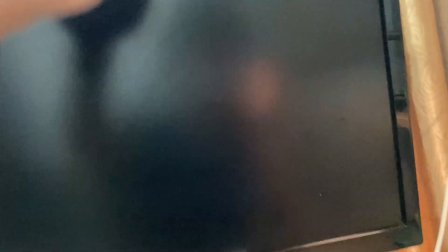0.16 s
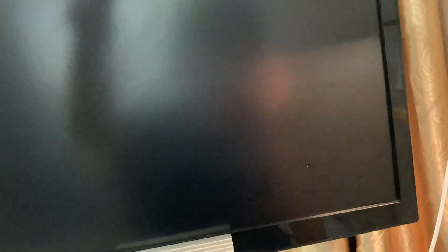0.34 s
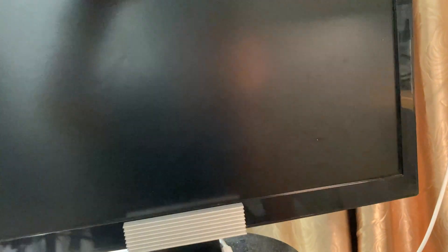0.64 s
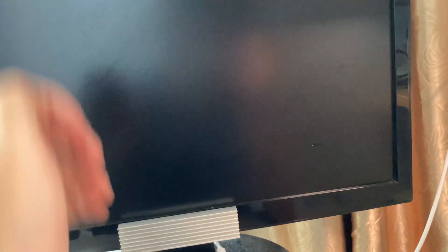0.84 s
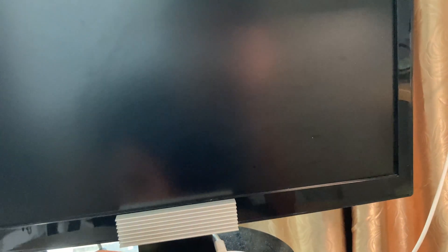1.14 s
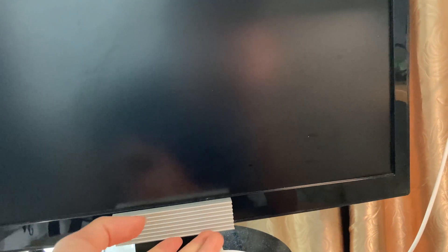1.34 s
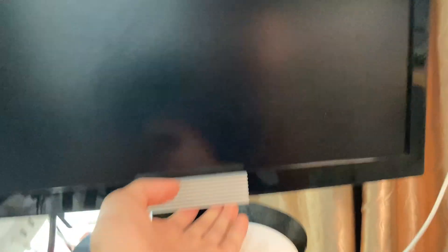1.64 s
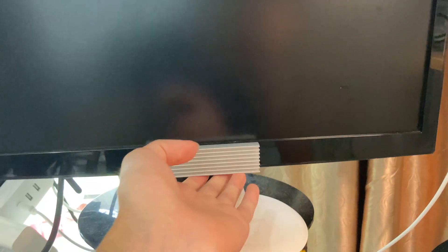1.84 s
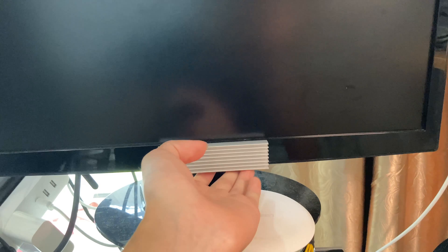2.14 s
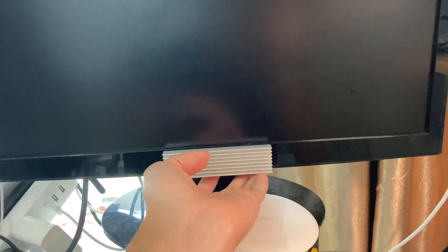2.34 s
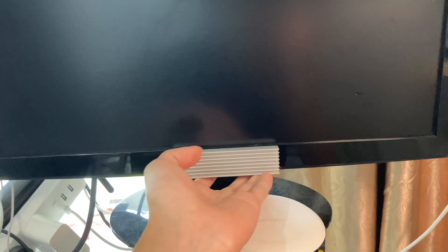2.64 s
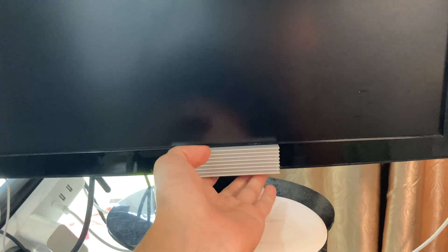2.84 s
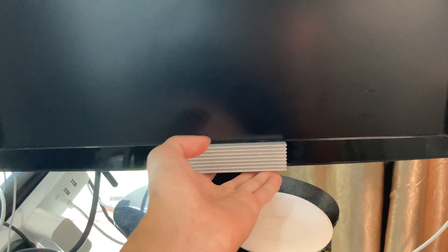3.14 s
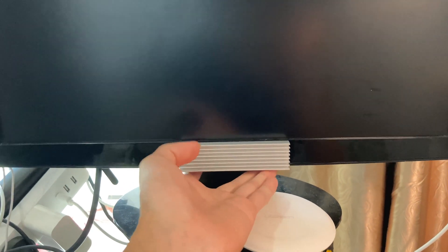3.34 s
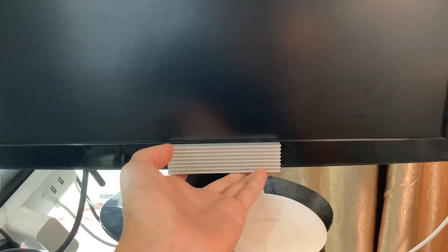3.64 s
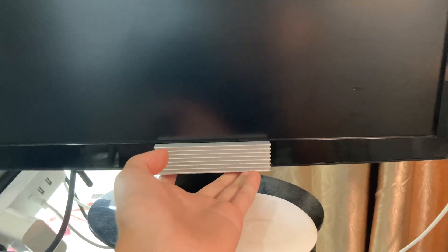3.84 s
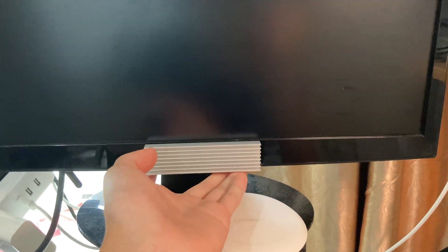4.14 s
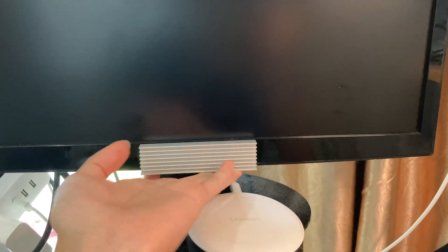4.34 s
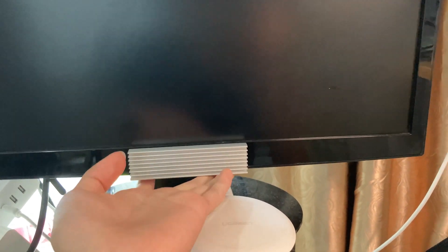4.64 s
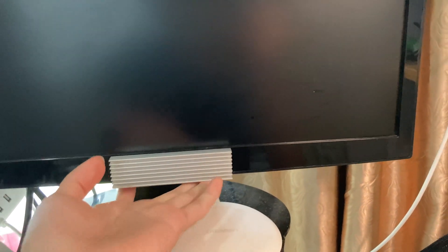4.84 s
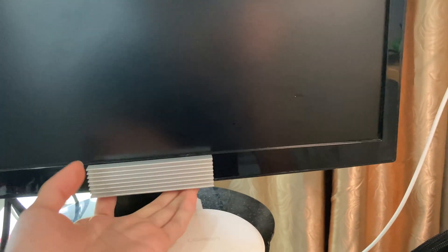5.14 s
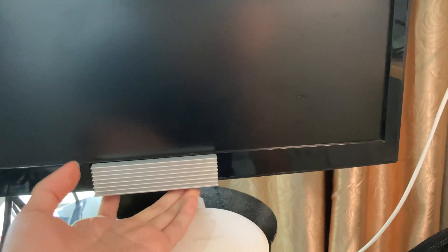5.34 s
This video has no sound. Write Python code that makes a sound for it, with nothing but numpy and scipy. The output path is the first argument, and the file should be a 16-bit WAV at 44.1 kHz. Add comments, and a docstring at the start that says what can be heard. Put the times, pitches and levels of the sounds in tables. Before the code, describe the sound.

In a small, quiet room, close to the microphone, a hand knocks twice on a monitor's plastic casing at about 0.03 and 0.4 seconds: loud, hollow, damped thuds with a sharp smack, loose clatter and crackling seams. Everything after is much quieter. Soft fingertip bumps and a weak click appear around 0.3 to 1.4 seconds, with a double click near 1.05. A dull grip bump comes at 1.6, then crisp clicks at 1.9 and 2.1, a tiny squeak at 2.3, and bumps and rubs around 2.5. Stronger button clicks begin at 2.8 and crowd together from 2.9 to 3.55, bright ticks with short plastic resonance. A sparse gap follows, with light touches near 4.2, then clicks from 4.3 and a busier run from 4.7 to 5.4. Stray fingernail ticks, sleeve rustle, faint hiss, rumble and a low wavering drone lie underneath.

```python
"""Two knocks on the plastic back of a monitor: damped casing modes, a smack, clattering parts and cracking seams.
A hand then feels along the lower bezel and presses buttons: noise bursts for the switches, damped modes
for bezel and panel. Between them fingers bump, rub and squeak: modes, uneven noise and a wavering tone.
A small room answers with a decaying noise tail; under it lie a faint hiss, a rumble, a sleeve's rustle
and a low drone that swells and fades."""
import sys
import numpy as np
from scipy import signal
from scipy.fft import rfft, irfft, next_fast_len
from scipy.io import wavfile

SR = 44100
rng = np.random.default_rng(int(sys.argv[2]) if len(sys.argv) > 2 else 0)


def int16_out(signal):
    """Quantize to a 16-bit WAV file."""
    q = np.round(np.clip(np.atleast_2d(signal).T, -1, 1) * 32767)
    wavfile.write(sys.argv[1], SR, q.astype(np.int16))


N = 242099
AGE = np.arange(SR * 3 // 4) / SR  # time since a blow, s

# Drone level before DRONE_DB: start_s, level_db
DRONE_LEVEL = [(0.68, -67), (0.91, -55.5), (1.28, -71), (1.44, -56.5), (1.52, -73), (1.59, -51.5),
               (1.72, -41.5), (1.79, -57), (1.98, -68), (2.88, -60), (3.17, -77), (3.56, -48), (3.68, -59),
               (3.83, -54), (4.17, -74), (4.24, -58), (4.32, -71), (5.49, -74.5)]
# Rumble level before RUMBLE_DB: start_s, level_db
RUMBLE_LEVEL = [(0.6, -68), (1.05, -72), (1.66, -70.5), (2.1, -73), (3.81, -69.5), (4.92, -71.5),
                (5.13, -59.5), (5.49, -81)]
# Sleeve rustle level before SLEEVE_DB: start_s, level_db
SLEEVE_LEVEL = [(0.7, -66.5), (1.5, -79), (1.77, -76), (2.33, -75), (3.15, -68.5), (3.93, -84),
                (5.22, -66.5), (5.49, -70)]
# Noise around the drone's tone: frequency_hz, density_db
DRONE_SPECTRUM = [(25, -26.5), (50, -5.5), (68, -13), (80, 1), (96, -18), (112, -15.5), (126, -2.5),
                  (145, -25), (300, -44), (600, -90)]
# Low rumble: frequency_hz, density_db
RUMBLE_SPECTRUM = [(15, -13.5), (30, -12.5), (52, 2), (65, -3), (100, -20), (300, -56), (600, -87.5)]
# Moving cloth: frequency_hz, density_db
SLEEVE_SPECTRUM = [(120, -15), (350, 1), (500, -4), (700, -9), (1000, -8), (1600, -15.5), (2500, -20.5),
                   (8000, -38.5), (16000, -47.5)]
# Still room air: frequency_hz, density_db
AIR_SPECTRUM = [(30, -11), (125, -3.5), (200, -3), (490, -13), (600, -19), (1020, -19.5), (3250, -35.5),
                (7300, -41.5), (12000, -41), (16000, -54.5)]

# Hand closing on the frame or shifting its hold: start_s, level_db
GRIPS = [(1.618, -41.5), (3.369, -54.5)]
# Dull bump of the gripping hand: frequency_hz, density_db
GRIP_SPECTRUM = [(25, -40), (55, -30), (85, -16), (130, -0.5), (190, 0), (260, -12.5), (380, -10),
                 (700, -24.5), (2000, -45), (5000, -77)]
# Skin squeaking on the glossy frame: start_s, length_s, pitch_hz, level_db
SQUEAKS = [(0.907, 0.082, 3070, -76), (2.291, 0.02, 2365, -61.5)]
# Fingers dragging along the bezel: start_s, length_s, level_db
RUBS = [(2.431, 0.1, -59), (2.572, 0.056, -60.5), (3.103, 0.12, -63.5), (4.382, 0.048, -51),
        (4.98, 0.036, -55)]
# Fingertips bumping the bezel: start_s, bezel_db, panel_db
TOUCHES = [(.735, -45.5, -51), (1.101, -43.5, -37.5), (1.367, -66, -50.5), (2.37, -77, -53),
           (2.466, -53, -41.5), (2.481, -40, -34.5), (2.597, -68, -55), (2.938, -60, -40.5),
           (4.172, -81, -61.5), (4.218, -77, -53), (4.279, -53, -50.5), (4.389, -43.5, -47),
           (4.699, -56, -52.5)]
# Presses, releases and fingernail ticks: start_s, switch_db, bezel_db, centre_hz (spot on the bezel)
CLICKS = [(0.2605, -37, -47.5, 1003), (1.0288, -44, -45.5, 1010), (1.0847, -43, -46, 970),
          (1.367, -56.5, -60.5, 1187), (1.8755, -41, -64, 1100), (1.9053, -43.5, -48.5, 1250),
          (2.0819, -40, -49, 1241), (2.418, -48.5, -51.5, 1700), (2.5339, -54, -46, 900),
          (2.8015, -33, -39, 1020), (2.9352, -45.5, -43.5, 882), (2.9806, -38.5, -30, 1020),
          (3.095, -31.5, -36, 1220), (3.1563, -34, -43, 1370), (3.248, -45, -35, 1065),
          (3.4, -35, -35, 910), (3.546, -42, -33.5, 1040), (3.9998, -55.5, -57, 930),
          (4.3354, -40.5, -42, 1120), (4.4247, -46.5, -37, 1060), (4.7186, -38.5, -39, 1260),
          (4.8359, -46.5, -33, 1360), (4.991, -34.5, -41.5, 1290), (5.056, -36.5, -38, 1300),
          (5.172, -44.5, -33, 1360), (5.3458, -45.5, -58.5, 1220), (5.3731, -37.5, -37.5, 1400)]
# Knocks on the casing: start_s, panel_db, clatter_db, crack_db, swell_s (of a mode at SWELL_HZ)
KNOCKS = [(0.0258, -5.5, -8, -17.5, .003), (0.3795, -4.5, -10, -16, 0.0062)]

# Modes of the bezel: frequency_hz, level_db, t60_s
BEZEL_MODES = [(770, -14.5, 0.032), (920, -8.5, 0.33), (1154, -0.5, 0.099), (1200, -9.5, 0.049),
               (1480, -7.5, 0.045), (1522, 1, 0.044), (1875, -15.5, 0.012), (2152, -12.5, 0.072),
               (2392, -19, 0.12)]
# Modes of the panel behind it: frequency_hz, level_db, t60_s
PANEL_MODES = [(243, -10.5, 0.076), (385, -3, 0.079), (485.8, 3, 0.065), (634, -1, 0.04)]
# Modes of the casing: frequency_hz, level_db, t60_s
CASING_MODES = [(131.97, -35, 0.52), (198.14, -13, 0.11), (239.4, -13.5, 0.12), (315.6, -19.5, 0.38),
                (346, 5.5, 0.065), (465, 1, 0.11), (490, -21.5, 0.36), (515.4, -3.5, 0.064),
                (616, -14.5, 0.11), (800, -17, 0.3), (863, -17, 0.11), (978, -15, 0.14),
                (1140, -16.5, 0.083), (1136, -11.5, 0.077), (1303, -18.5, 0.17), (1251, -12.5, .11),
                (1540, -18.5, 0.097), (1664, -18.5, .11), (1700, -20.5, 0.063), (2396, -23, 0.16),
                (2524, -20.5, 0.11), (2830, -21.5, .08)]
# Snap of the switch: frequency_hz, density_db
TICK_SPECTRUM = [(1500, -21.5), (3500, -9), (5800, -7), (7700, 0.5), (11300, -4), (13000, -9), (16000, -13)]
# Clack of the key cap: frequency_hz, density_db
CLACK_SPECTRUM = [(900, -19), (1700, 4.5), (2300, 1.5), (3000, 2.5), (3500, -8.5), (4300, 2.5), (5000, -6),
                  (6000, -16), (10000, -30.5), (16000, -35.5)]
# Dense modes of the bezel: frequency_hz, density_db
RATTLE_SPECTRUM = [(400, -18), (700, -7), (1000, 6), (1300, 3.5), (1700, -6.5), (2300, -9.5), (3200, -21),
                   (7000, -32), (16000, -50.5)]
# Dense upper modes of the casing: frequency_hz, density_db
CLATTER_SPECTRUM = [(150, -32.5), (400, -1.5), (800, -5), (1300, -4.5), (2000, -12.5), (2600, -11.5),
                    (3600, -17), (5500, -24), (9000, -39), (16000, -49.5)]
# Crack of the casing's seams: frequency_hz, density_db
CRACK_SPECTRUM = [(1500, -21), (3500, -13.5), (5500, -9.5), (7800, 0.5), (11000, 3), (13000, -2),
                  (16000, -3.5)]

# Likeness of noise at the two ports: frequency_hz, likeness (0 to 1)
PORT_LIKENESS = [(100, 0.85), (450, 0.76), (900, 0.3), (1600, 0), (5000, 0.18)]
# Phase of a mode between the two microphone ports: frequency_hz, phase_rad
PORT_PHASE = [(200, .15), (500, .35), (800, 1.2), (1300, 1.5)]
# Reverberation time: frequency_hz, t60_s
ROOM_DECAY = [(150, 0.81), (350, 0.31), (700, 0.52), (1200, 0.4), (4000, 0.39), (8000, 0.44), (15000, 0.32)]
# Reflection from the walls: frequency_hz, gain_db
WALL_REFLECTION = [(150, -4.5), (450, -8.5), (900, -4), (1500, 0.5), (2500, 0), (5000, -0.5), (11000, -6.5),
                   (16000, -3.5)]
# Direct sound, left minus right: frequency_hz, difference_db
DIRECT_LEAN = [(550, 0), (850, 5), (1400, 7), (2500, 0), (5000, 0)]
# Response of the microphone ports: frequency_hz, gain_db
MIC_RESPONSE = [(8000, 0.5), (8600, -4.5), (9200, -19.5), (9900, -0.5), (11200, 4), (12600, 2.5),
                (13800, -12), (15200, 0), (16200, -5)]

DRONE_HZ, DRONE_WANDER = 80, 0.052  # mean pitch, and its rms relative drift
DRONE_DB, RUMBLE_DB, SLEEVE_DB, AIR_DB = 2, 1.5, 5.5, -68.5  # the first three ride on their curves
SQUEAK_OCTAVE_DB = -15  # second harmonic, relative to the first
FAINTEST_DB, FAINT_SPAN_DB = -63.25, 3  # stray fingernail ticks
FEELING_S = (1.0, 5.4)  # first and last possible stray tick
RUB_ROUGH_DB = 0.5  # the skin catches and lets go
GRIT_DB = -7.5  # dry scratch on the ribbed plastic, relative to the bezel
TOUCH_RISE_S = 0.0044  # a soft fingertip loads the plastic slowly
CONTACT_S = 0.0013  # rise time of a switch snapping over
CLACK_DB = -11  # key cap, relative to the tick
REBOUND_GAP_S = (0.00272, 0.01224)  # shortest and longest gap between the key cap's contacts
FIRST_REBOUND_DB, REBOUND_STEP_DB = -9, -6  # mean level of the first rebound; change at each next one
RING_RISE_S = 0.0026  # the bezel builds up more slowly than the switch
MIDDLE_HZ, PANEL_DB = 1150, -9  # bezel centre of an average spot; its panel, relative to the bezel
PANEL_DB_PER_OCTAVE = -15.5  # stiffer, higher spots move the panel less
SWELL_HZ = 445  # the mode that takes the swell time; higher modes start sooner
SMACK_DB, SMACK_S = 1.5, 0.013  # the hand's impact, relative to the clatter; its t60
TOP_HZ = 16100  # upper band edge


def amp(db):
    """Level to amplitude ratio: 20 dB is a factor of ten."""
    return 10 ** (np.asarray(db) / 20)


def unit(x):
    """Normalisation to an rms value of 1."""
    return x / np.sqrt(np.mean(x ** 2) + 1e-20)


def along(points, hz):
    """Linear interpolation of (hz, value) points on a logarithmic frequency axis."""
    f, v = np.transpose(points)
    return np.interp(np.log(hz + 1), np.log(f + 1), v)


def curve(points):
    """Linear interpolation of (s, value) points in time, one value per sample."""
    return np.interp(np.arange(N) / SR, *np.transpose(points))


def filtered(x, response):
    """Linear filtering: the spectrum of x times a response of frequency."""
    n = x.shape[-1]
    m = next_fast_len(n + SR // 8)
    return irfft(rfft(x, m) * response(np.fft.rfftfreq(m, 1 / SR)), m)[..., :n]


def noise(spectrum, size):
    """Partial coherence: coloured stereo noise of rms 1 whose two ports agree most in the bass."""
    def mid_side_gains(hz):
        angle = np.arccos(np.clip(along(PORT_LIKENESS, hz), -1, 1)) / 2
        return amp(along(spectrum, hz)) * [np.cos(angle), np.sin(angle)]

    mid, side = filtered(rng.standard_normal((2, size)), mid_side_gains)
    return unit(np.array([mid + side, mid - side]))


def wobble(rate_hz, size):
    """Random fluctuation: low-passed noise of rms 1."""
    return unit(filtered(rng.standard_normal(size), lambda hz: np.exp(-(hz / rate_hz) ** 2)))


def chatter(depth_db):
    """Repeated contact: loose parts make the gain uneven from millisecond to millisecond."""
    return amp(depth_db * np.tanh(wobble(400, len(AGE))))


def fade(t60, t=AGE):
    """Exponential damping: free decay by 60 dB in t60."""
    return np.exp(-np.log(1000) * t / t60)


def swell(rise):
    """Finite contact time: a smooth onset."""
    return 1 - np.exp(-(AGE / rise) ** 2)


def burst(spectrum, rise, t60, rough_db=0):
    """High modal density: many close modes sound like noise and die together."""
    smooth = swell(rise) * fade(t60)
    uneven = smooth * chatter(rough_db)
    # chatter shifts the envelope's energy in time without adding any
    envelope = uneven * np.linalg.norm(smooth) / np.linalg.norm(uneven)
    return noise(spectrum, len(AGE)) * envelope


def ring(modes, rise, scatter_db, detune):
    """Modal superposition: damped sines, varied at each blow, the higher ones less in step at the two ports."""
    out = np.zeros((2, len(AGE)))
    for k, (hz, db, t60) in enumerate(modes):
        size, shift, start = rng.standard_normal(3)
        skew = (-1) ** k * along(PORT_PHASE, hz)
        phase = np.pi * start + np.array([[1], [-1]]) * skew / 2
        sine = np.sin(2 * np.pi * hz * (1 + detune * shift) * AGE + phase)
        out += amp(db + scatter_db * size) * fade(t60) * sine
    return out * swell(rise)


def add(track, s, sound):
    """Superposition: mix a sound in at time s."""
    i = max(round(s * SR), 0)
    track[:, i:i + sound.shape[1]] += sound[:, :N - i]


def in_room(sound, wet_db, build):
    """Reverberation: a diffuse tail builds up behind a direct sound that leans left."""
    hz, t, z = signal.stft(noise([(100, 0), (10000, 0)], len(AGE)), SR, nperseg=256)
    decaying = z * fade(along(ROOM_DECAY, hz)[:, None], t)
    tail = signal.istft(decaying, SR, nperseg=256)[1][:, :len(AGE)]
    tail = tail * swell(build) * chatter(depth_db=1.5)  # echoes arrive in clumps
    tail = filtered(tail / np.linalg.norm(tail[0]), lambda hz: amp(along(WALL_REFLECTION, hz)))
    echo = signal.fftconvolve(sound, tail, axes=1)[:, :len(AGE)]
    direct = filtered(sound, lambda hz: amp(np.outer([1, -1], along(DIRECT_LEAN, hz)) / 2))
    return direct + amp(wet_db) * echo


def drone():
    """Frequency modulation: a low tone of wandering pitch within narrow-band noise."""
    pitch_hz = DRONE_HZ * (1 + DRONE_WANDER * wobble(3.6, N))
    tone = np.sin(2 * np.pi * np.cumsum(pitch_hz) / SR)
    return amp(DRONE_DB + curve(DRONE_LEVEL)) * (tone + amp(-7.5) * noise(DRONE_SPECTRUM, N))


def rumble():
    """Amplitude modulation: low-frequency noise that swells and fades."""
    return amp(RUMBLE_DB + curve(RUMBLE_LEVEL)) * noise(RUMBLE_SPECTRUM, N)


def sleeve():
    """Friction of cloth: noise whose level flutters as the folds move."""
    folds_db = 3 * wobble(12, N)
    return amp(SLEEVE_DB + curve(SLEEVE_LEVEL) + folds_db) * noise(SLEEVE_SPECTRUM, N)


def air():
    """Stationary noise: the steady faint hiss of room air."""
    return amp(AIR_DB) * noise(AIR_SPECTRUM, N)


def grip():
    """Damped impact: the hand takes hold of the frame with a dull bump."""
    track = np.zeros((2, N))
    for s, db in GRIPS:
        add(track, s, amp(db) * burst(GRIP_SPECTRUM, rise=0.004, t60=0.36))
    return track


def stroke(length):
    """Pressure envelope: a finger's force rises and falls once, as half a sine."""
    return np.sin(np.pi * np.minimum(AGE / length, 1))


def squeaks():
    """Stick-slip oscillation: a sliding fingertip sings at a wavering pitch."""
    track = np.zeros((2, N))
    for s, length, hz, db in SQUEAKS:
        phase = 2 * np.pi * np.cumsum(hz * (1 + 0.09 * wobble(210, len(AGE)))) / SR
        tone = np.sin(phase) + amp(SQUEAK_OCTAVE_DB) * np.sin(2 * phase)
        squeak = amp(db) * np.tile(stroke(length) * tone, (2, 1))
        add(track, s, in_room(squeak, wet_db=-2, build=0.0058))
    return track


def stray_ticks(count=8):
    """Light impact: fingernails graze the frame at random times, barely above the room air."""
    track = np.zeros((2, N))
    first, last = FEELING_S
    for when, size in rng.uniform(0, 1, (count, 2)):
        tick = burst(TICK_SPECTRUM, CONTACT_S, t60=0.018, rough_db=5.5)
        clack = amp(-4.5) * burst(CLACK_SPECTRUM, CONTACT_S, t60=0.04, rough_db=7.5)
        graze = amp(FAINTEST_DB + FAINT_SPAN_DB * size) * (tick + clack)
        add(track, first + when * (last - first), in_room(graze, wet_db=-3.5, build=0.005))
    return track


def rubs():
    """Friction excitation: a dragging finger keeps catching and stirs the bezel's dense modes."""
    track = np.zeros((2, N))
    for s, length, db in RUBS:
        scrape = noise(RATTLE_SPECTRUM, len(AGE)) + amp(GRIT_DB) * noise(CLACK_SPECTRUM, len(AGE))
        rub = amp(db) * stroke(length) * unit(scrape * chatter(RUB_ROUGH_DB))
        add(track, s, in_room(rub, wet_db=-20.5, build=0.0034))
    return track


def touches():
    """Soft impact: long contact of a fingertip moves bezel and panel without a snap."""
    track = np.zeros((2, N))
    for s, bezel_db, panel_db in TOUCHES:
        bezel = ring(BEZEL_MODES[:4], TOUCH_RISE_S, scatter_db=1.5, detune=0.0546)
        bezel = bezel + amp(-3.5) * burst(RATTLE_SPECTRUM, TOUCH_RISE_S, t60=0.078, rough_db=18.5)
        panel = ring(PANEL_MODES, TOUCH_RISE_S, scatter_db=2.5, detune=0.045)
        touch = amp(bezel_db) * bezel + amp(panel_db) * panel
        add(track, s, in_room(touch, wet_db=-7.5, build=0.008))
    return track


def spot_colour(depth_db):
    """Local response: random peaks and dips for each click, as a gain over frequency."""
    knots_hz = np.geomspace(1500, 16000, 40)
    points = np.column_stack([knots_hz, depth_db * rng.standard_normal(len(knots_hz))])
    return lambda hz: unit(amp(along(points, hz)))


def rebounding(sound, count=3):
    """Inelastic rebound: a loose key cap settles in a few contacts, weaker on average each time."""
    times = np.cumsum(rng.uniform(*REBOUND_GAP_S, count))
    sizes = rng.standard_normal(count)
    out = sound.copy()
    for k, s in enumerate(times):
        later = np.pad(sound, ((0, 0), (round(s * SR), 0)))[:, :len(AGE)]
        out += amp(FIRST_REBOUND_DB + REBOUND_STEP_DB * k + 2 * sizes[k]) * later
    return out


def clicks():
    """Impulsive excitation: switch and key cap snap; the bezel builds up later, the heavier panel last."""
    track = np.zeros((2, N))
    for s, switch_db, bezel_db, centre_hz in CLICKS:
        tick = burst(TICK_SPECTRUM, CONTACT_S, t60=0.016, rough_db=5.0)
        clack = amp(CLACK_DB) * burst(CLACK_SPECTRUM, CONTACT_S, t60=0.076, rough_db=8.5)
        switch = filtered(rebounding(tick + clack), spot_colour(depth_db=3))

        bezel = amp(-5) * ring(BEZEL_MODES, RING_RISE_S, scatter_db=0.5, detune=0.037)
        bezel = bezel + amp(-2.5) * burst(RATTLE_SPECTRUM, RING_RISE_S, t60=0.076, rough_db=4)
        # the spot that is pressed favours the lower or the higher modes
        tilt_db = 18 * np.log2(centre_hz / 1200)  # per octave, within half an octave of the centre
        bezel = filtered(bezel, lambda hz: amp(tilt_db * np.clip(np.log2((hz + 1) / centre_hz), -.5, .5)))

        panel_db = PANEL_DB + PANEL_DB_PER_OCTAVE * np.log2(centre_hz / MIDDLE_HZ)
        panel = amp(panel_db) * ring(PANEL_MODES, rise=0.0062, scatter_db=5.5, detune=0.048)
        click = amp(switch_db) * switch + amp(bezel_db) * (bezel + panel)
        add(track, s, in_room(click, wet_db=-5.0, build=0.0049))
    return track


def knocks():
    """Plate impact: the hand smacks the casing, its seams crack and clatter, and the low modes swell up."""
    track = np.zeros((2, N))
    for s, panel_db, clatter_db, crack_db, rise in KNOCKS:
        panel = np.zeros((2, len(AGE)))
        for mode in CASING_MODES:
            panel += ring([mode], rise * SWELL_HZ / mode[0], scatter_db=2.0, detune=0.00092)
        smack = amp(clatter_db + SMACK_DB) * burst(RATTLE_SPECTRUM, rise=0.0008, t60=SMACK_S)
        clatter = amp(clatter_db) * burst(CLATTER_SPECTRUM, rise=0.0012, t60=0.14, rough_db=5.5)
        crack = amp(crack_db) * burst(CRACK_SPECTRUM, rise=0.0004, t60=0.097, rough_db=11.0)
        knock = amp(panel_db) * panel + smack + clatter + crack
        add(track, s, in_room(knock, wet_db=-7.5, build=0.0094))
    return track


def scene():
    """Linear superposition of every source in the room."""
    background = drone() + rumble() + sleeve() + air()
    fingers = grip() + squeaks() + stray_ticks() + rubs() + touches()
    return background + fingers + clicks() + knocks()


def record(dry):
    """Transduction: the microphone ports notch the treble, loud peaks saturate, and the band ends."""
    sound = filtered(dry, lambda hz: amp(along(MIC_RESPONSE, hz)))
    sound = sound / (1 + sound ** 8) ** (1 / 8)
    return filtered(sound, lambda hz: 1 / (1 + (hz / TOP_HZ) ** 120))


dry = scene()
out = record(dry)
int16_out(out)
```